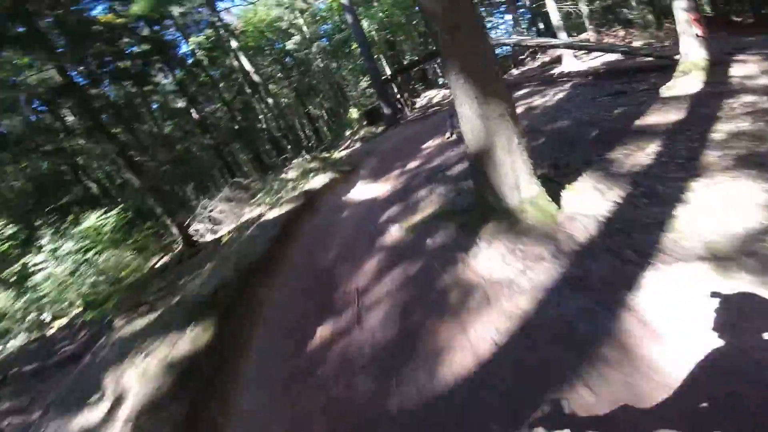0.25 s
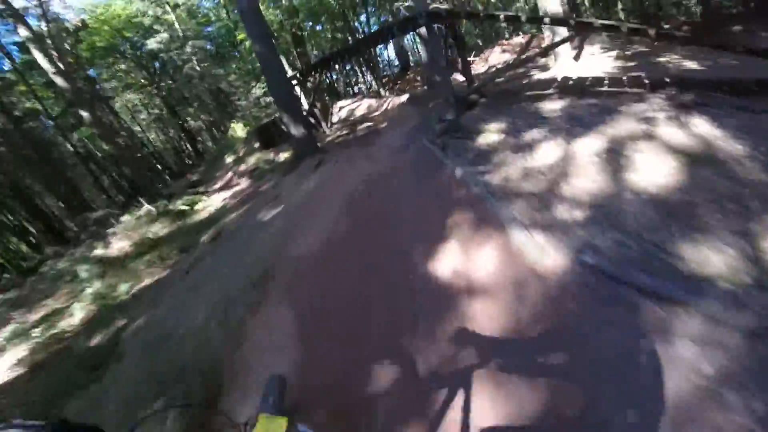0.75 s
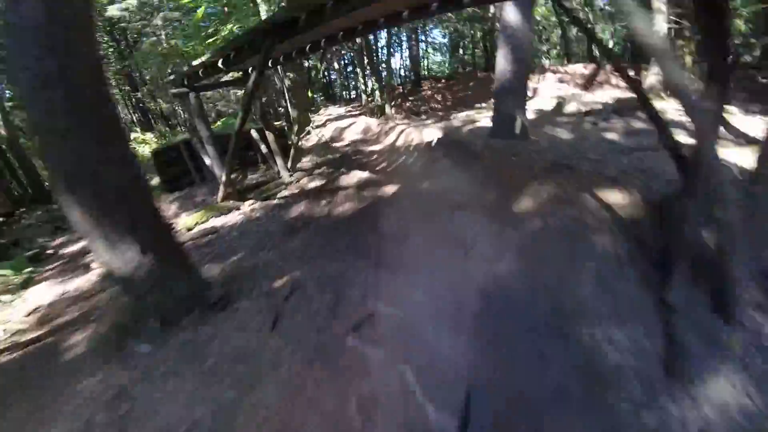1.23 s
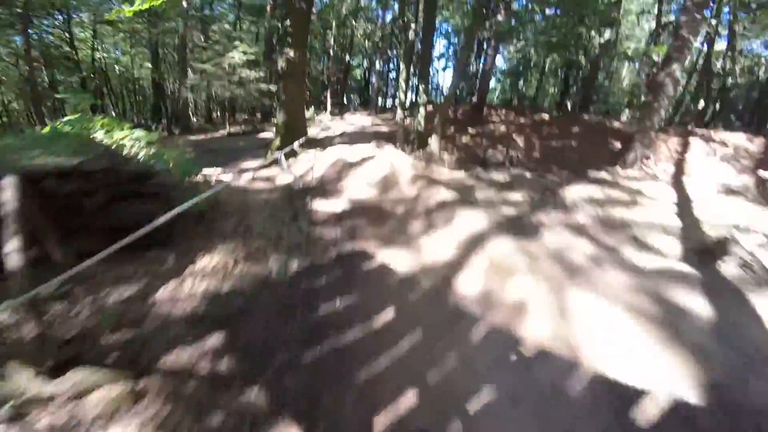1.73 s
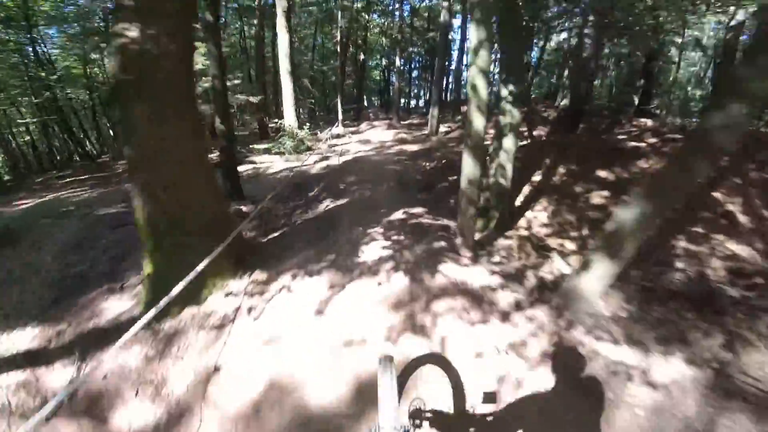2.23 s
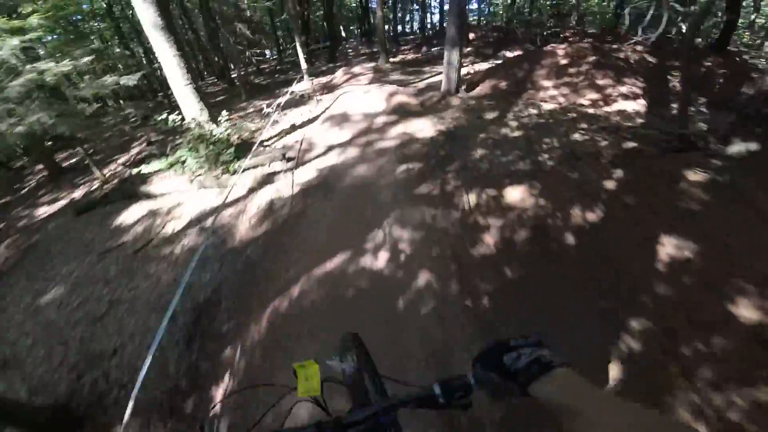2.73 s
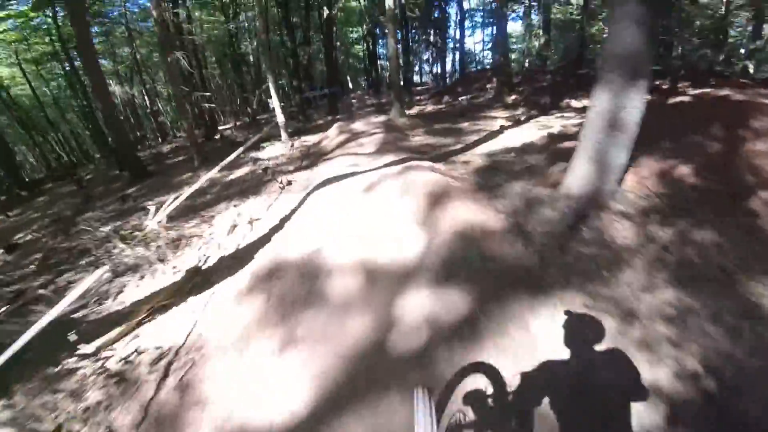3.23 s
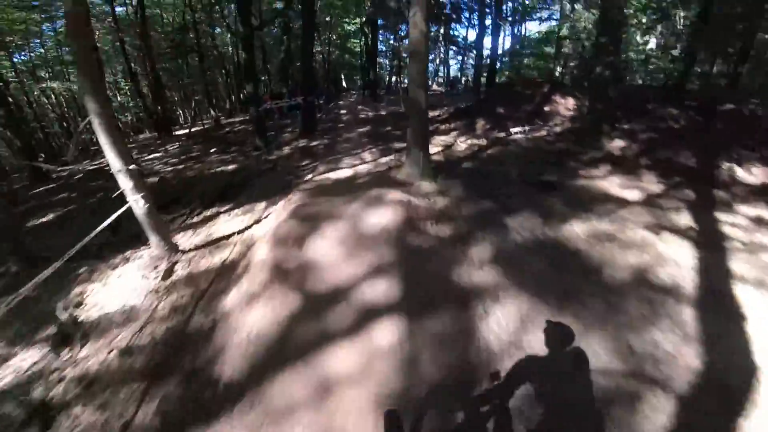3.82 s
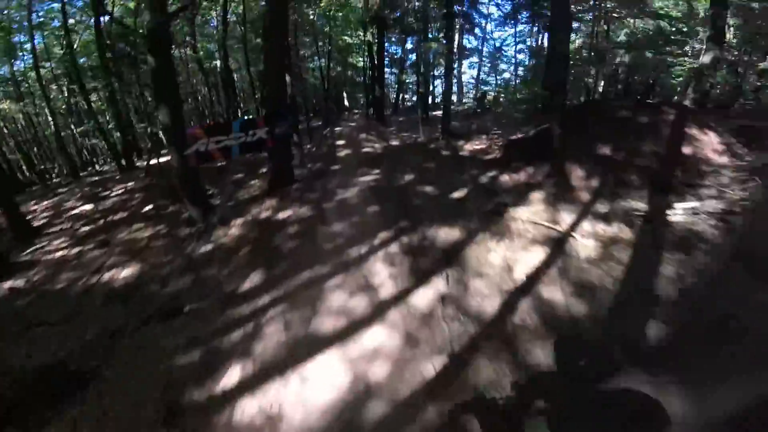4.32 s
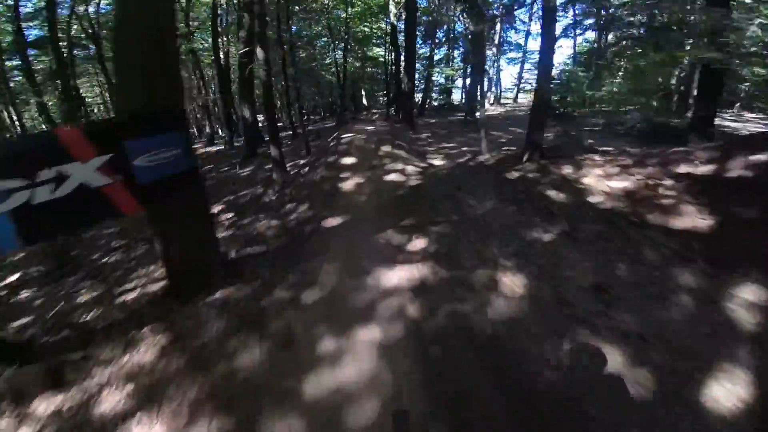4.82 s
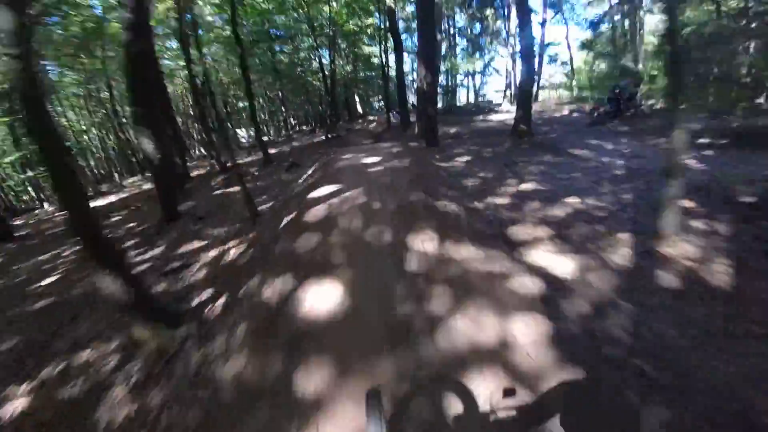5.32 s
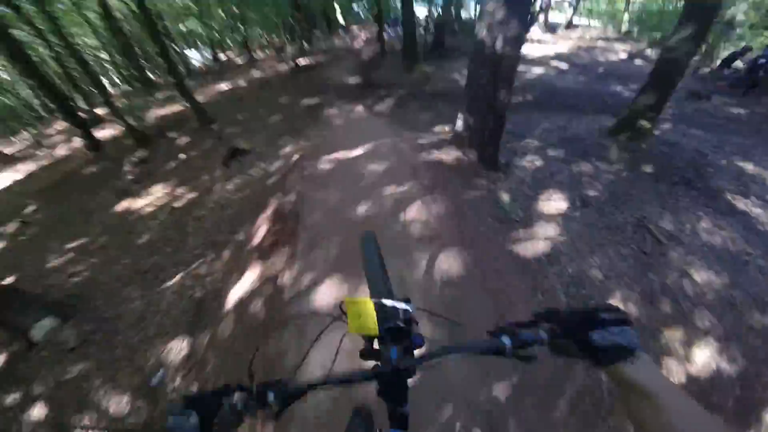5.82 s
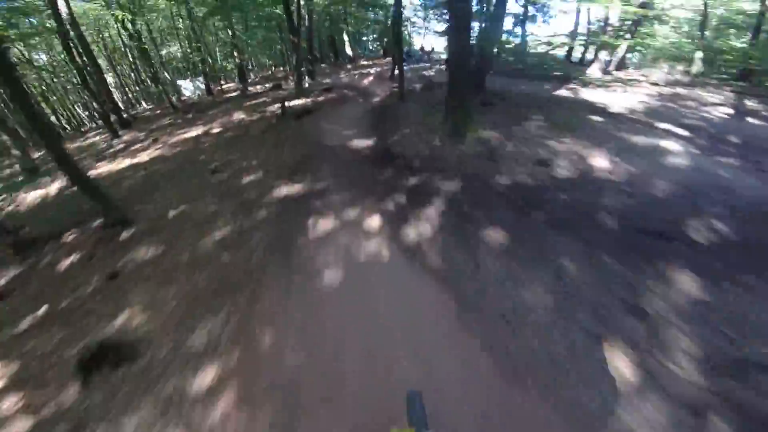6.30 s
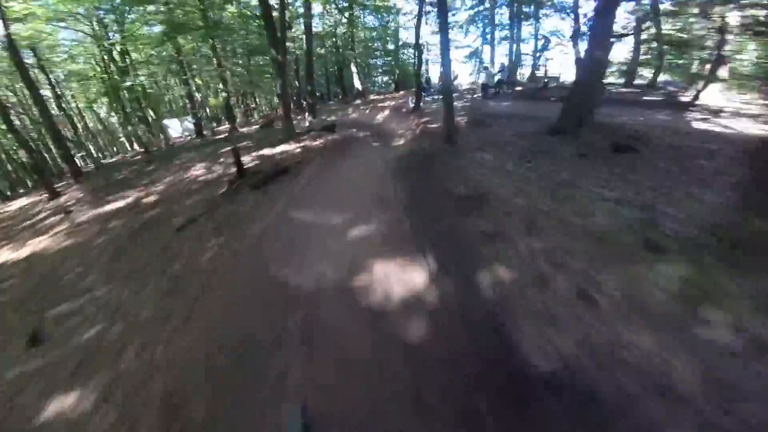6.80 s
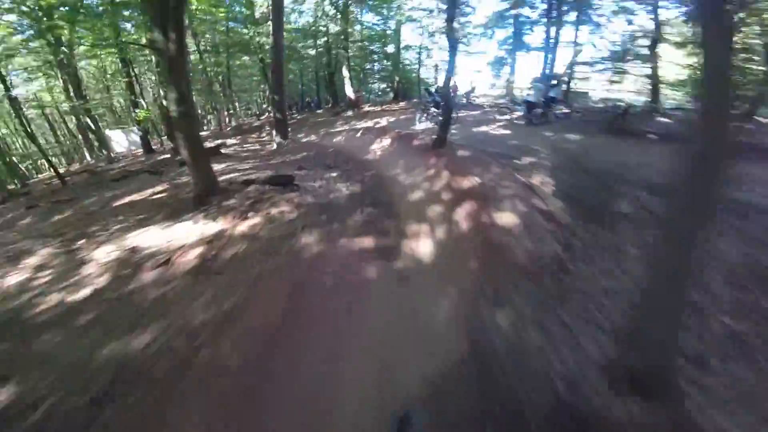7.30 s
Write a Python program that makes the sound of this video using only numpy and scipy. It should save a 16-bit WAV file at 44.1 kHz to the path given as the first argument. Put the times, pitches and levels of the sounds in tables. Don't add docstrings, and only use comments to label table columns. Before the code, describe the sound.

A mountain bike speeds down a dirt forest trail, heard from a helmet microphone close above the tyres. From 0 to 2.4 seconds knobbly tyres roar and crunch over roots with dull knocks, chain slaps and stone ticks, the sharpest clatter near 0.9, while low gusts shake and flutter over the microphone. At 2.5 the wheels lift, the roar fades and a faint freehub ratchet whirs; at 3.0 a hard landing brings a jolt and thump. The rolling is softer until a tiny hop at 3.8. From 4 to 5.7 the ground gets rougher, with hissing grit, hollow casing booms and a heavy compression around 5.6. Short jumps at 5.8 and 6.24 thin the tread, each ending in an abrupt return, with mount bumps near 6.35. Then the grainy roar builds again, with scattered ticks and windy buffeting until the end at about 7.5.

```python
import sys
import numpy as np
from scipy import signal
from scipy.fft import rfft, irfft, next_fast_len
from scipy.io import wavfile
from scipy.ndimage import uniform_filter1d, map_coordinates

SR = 44100
rng = np.random.default_rng(int(sys.argv[2]) if len(sys.argv) > 2 else 0)


def boost_factor(decibels):
    exponent = np.asarray(decibels, float) / 20
    return 10 ** exponent


def pcm_store(signal):
    levels = np.round(np.clip(np.atleast_2d(signal), -1, 1) * 32767)
    wavfile.write(sys.argv[1], SR, levels.astype(np.int16).T)


N = 332955
STEP_S = .002

# peak in [s], shake in [dB], flutter in
# [dB], half length in [s].
GUSTS = [(0.0, -15, -23, 0.055), (0.4, -27, -30, 0.43), (1.1, -28, -45, 0.068), (2.0, -30, -36, 0.16),
         (2.22, -31, -30, 0.07), (3.27, -27, -55, 0.039), (3.46, -33, -64, 0.048), (3.97, -22.5, -59, 0.11),
         (4.27, -25.5, -34.5, 0.23), (4.68, -21, -34.5, 0.082), (5.1, -23.5, -31.5, 0.22),
         (5.55, -20, -32.5, 0.15), (5.97, -39, -31, 0.068), (6.17, -36.5, -36, 0.16),
         (6.42, -23, -53, 0.15), (6.6, -32.5, -47, 0.18), (6.83, -22, -34, 0.12), (7.55, -20.5, -33, 0.056),
         (0.155, -27, -22.5, 0.029), (0.56, -27, -49, 0.033), (0.686, -24, -28, 0.022),
         (0.8, -14.5, -39, 0.027), (0.95, -25, -34, 0.072), (1.447, -21.5, -42, 0.032),
         (1.589, -15, -30, 0.068), (1.799, -21, -30.5, 0.12), (2.376, -22, -57, 0.1),
         (2.545, -25.5, -29, 0.074), (2.701, -20.5, -36, 0.019), (2.868, -34.5, -32, 0.11),
         (3.127, -21, -51, 0.054), (3.61, -21.5, -55, 0.019), (3.788, -24.5, -48, 0.045),
         (4.838, -26, -31.5, 0.03), (5.225, -26, -23, 0.085), (5.684, -18.5, -34, 0.024),
         (5.78, -25, -55, 0.1), (7.043, -25, -32, 0.094), (7.197, -22, -36, 0.032),
         (7.273, -36, -35.5, 0.15)]
LULL_SHAKE_DB, LULL_FLUTTER_DB = -34.5, -39.5
# frequency in [Hz], level in [dB per Hz].
SHAKE_COLOUR = [(4.7, -26), (8.0, 2.5), (32, 5.5), (75, -29.5), (98, -19), (160, -120)]
# frequency in [Hz], level in [dB per Hz].
FLUTTER_COLOUR = [(35, -15.5), (60, 5), (157, -6), (412, -35.5), (451, -64), (709, -40.5), (900, -42),
                  (1170, -101), (1980, -120)]
# frequency in [Hz], width in [Hz], level in [dB].
HELMET_AIR = [(267, 134, 0)]
HUM_UNDER_FLUTTER_DB, HUM_IDLE_DB = 19, -63.5
# time in [s], depth in [dB].
NODS = [
    (.162, -12),
    (.681, -10.5),
    (3.099, -8),
    (3.905, -16),
    (4.007, -11.5),
    (5.463, -12.5),
    (5.643, -11.5),
    (6.421, -11),
    (7.196, -10.5),
]
NOD_S = .011

# start in [s], peak in [dB], pitch in [Hz].
BLOWS = [(0.15, -23.5, 133), (0.5, -24.5, 125), (0.9, -22.5, 130), (2.5, -20.5, 140), (2.599, -20.5, 144.6),
         (2.893, -27, 130), (3.754, -24.5, 131), (4.373, -24.5, 140), (5.3, -25.5, 120),
         (5.683, -17.5, 118), (6.19, -29.5, 152), (0.927, -8.5, 46.6), (1.6, -24, 77.5), (1.613, -16, 64),
         (1.553, -19.5, 125), (0.4, -20.5, 141), (0.04, -24.5, 130), (4.27, -29, 160), (0.3, -29, 200),
         (1.38, -28, 132), (2.5, -26, 200), (2.849, -26, 70), (5.7, -24, 58)]
BLOW_CYCLES = 12.1
# time in [s], jump in [dB], direction (signed share), creep in [s], judder in [dB].
MOUNT_SLIPS = [
    (0.737, -25.5, -0.88, 0.011, -32),
    (3.041, -13, 0.88, 0.011, -30.5),
    (5.405, -22, 0.54, 0.0038, -54),
    (5.6009, -22.5, 0.8, 0.0072, -33.5),
    (6.337, -28, 1, 0.016, -50),
    (6.3692, -20, 0.81, 0.03, -54),
]

# take-off in [s], landing in [s], roll lost in [dB],
# ratchet gained in [dB].
FLIGHTS = [
    (2.49, 2.987, 4.5, 2.5),
    (3.836, 3.894, 5, 5),
    (5.78, 6.007, 8, 0),
    (6.237, 6.317, 4, 1),
]
LIFT_S, LAND_S = 0.076, .004
# time in [s], ratchet rate in [teeth per s].
RATCHET_RATE = [(0, 100), (1, 108), (2, 92), (2.8, 120), (3, 81), (3.8, 93), (4.45, 120), (5.1, 160),
                (5.9, 92), (6.2, 73), (6.9, 89), (7.55, 125)]
# frequency in [Hz], width in [Hz], level in [dB].
HUB_BANDS = [(2800, 450, 1), (5400, 600, -1), (6450, 200, 2), (9300, 500, -10), (10650, 250, -18),
             (12100, 500, -4), (13200, 450, 0)]
HUB_DB = -83.5
# middle in [s], loss in [dB], rise in [s], release in [s].
PAWL_RESTS = [
    (0.8, 9, 0.07, 0.33),
    (1.75, 3, .1, 0.28),
    (3.08, 21, 0.036, 0.42),
    (4.0, 4, .4, 0.75),
    (6.54, 9, 0.25, 0.46),
]

# time in [s], peak in [dB], pitch in [Hz], t60 in [s], ring over puff in [dB].
CHAIN_SLAPS = [(0.0487, -35.5, 6500, 0.055, 1), (0.2279, -43, 6480, 0.05, -6),
               (0.2468, -38.5, 6500, 0.058, -4), (0.275, -39, 6500, 0.046, 6),
               (0.3252, -38, 6310, 0.05, -4), (0.3726, -38, 6420, 0.05, -4),
               (0.4135, -32.5, 6410, 0.046, -3), (0.6903, -36, 6360, 0.05, -7),
               (0.8036, -36, 6480, 0.035, -10), (0.8295, -43, 6600, 0.05, -6),
               (0.8946, -22, 6700, 0.037, -8), (0.9154, -36, 6520, 0.066, -7), (0.9837, -44, 6970, 0.05, 2),
               (1.0116, -47, 6830, 0.05, -4), (1.4052, -40, 6470, 0.045, -6), (1.5145, -37, 6400, 0.046, 1),
               (1.6866, -43, 6340, 0.05, -6), (1.7549, -41, 6450, 0.058, -6), (2.029, -44, 6420, 0.05, 0),
               (2.39, -40, 6470, 0.05, -4), (2.8105, -42, 6470, 0.05, -6), (3.1258, -40.5, 6660, 0.081, 0),
               (3.3972, -49, 6110, 0.06, -6), (3.45, -45, 6130, 0.044, -9), (3.8044, -44, 6560, 0.046, -6),
               (4.0632, -40, 6410, 0.05, -3), (4.1849, -42, 6440, 0.05, -1), (4.226, -39, 6500, 0.056, -6),
               (4.3635, -31, 6500, 0.059, -11), (5.0459, -43, 6360, 0.05, 0), (5.424, -37, 6590, 0.084, -9),
               (5.5846, -35, 5830, 0.14, -11), (5.7608, -42, 6510, 0.05, -4), (5.7708, -35, 8300, 0.05, -8),
               (6.989, -43, 6420, 0.05, -6), (7.1824, -43.5, 6490, 0.075, -6)]
# time in [s], peak in [dB], pitch in [Hz], t60 in [s], ring over puff in [dB].
STONES = [(0.1356, -39, 5660, 0.065, -6), (0.63, -39, 5250, 0.055, -4), (1.055, -37.5, 5400, 0.055, -14),
          (1.5435, -31.5, 4890, 0.057, -6), (1.5998, -44, 3590, 0.055, -6), (1.6104, -40, 5280, 0.055, -6),
          (1.6447, -32, 5170, 0.055, -15), (2.354, -38, 5460, 0.055, -4), (2.431, -42, 4930, 0.055, -2),
          (2.4807, -39, 5010, 0.044, -6), (2.502, -37, 4970, 0.065, -6), (3.0842, -31.5, 5140, 0.048, -14),
          (3.667, -51, 3300, 0.055, 3), (3.7908, -43, 5180, 0.055, -6), (4.331, -46, 5140, 0.055, -4),
          (4.8965, -40, 5260, 0.072, -2), (5.0988, -40.5, 5040, 0.036, 5), (5.4031, -40, 5200, 0.047, -8),
          (5.5029, -39, 3550, 0.055, -11), (5.6935, -43, 5140, 0.055, 3), (5.7344, -31, 5070, 0.043, 2),
          (5.8343, -36, 5500, 0.046, -3), (6.2472, -39, 5170, 0.055, -11), (6.5395, -43, 5620, 0.074, -6),
          (6.8615, -36, 5170, 0.042, -16), (7.0085, -41, 4820, 0.055, -8), (7.4844, -42.5, 4830, 0.055, -6)]
# time in [s], peak in [dB], t60 in [s].
ROOTS = [(0.646, -26, 0.057), (0.692, -27.5, 0.045), (0.979, -38, 0.081), (1.025, -40, 0.3),
         (1.27, -39.5, 0.096), (1.314, -40, 0.099), (1.368, -30, 0.073), (1.399, -35, 0.074),
         (1.485, -32, 0.14), (2.3, -34, 0.09), (2.359, -35, 0.36), (2.536, -40, .055), (2.995, -39, 0.2),
         (3.077, -30, 0.05), (3.76, -43, 0.088), (3.942, -34.5, 0.055), (4.118, -37, 0.21),
         (5.532, -30, 0.13), (5.583, -36, 0.21), (6.319, -33.5, 0.082), (6.643, -38, 0.52),
         (7.537, -26, 0.048), (0.384, -34, .06), (0.449, -38, 0.05), (0.727, -24, 0.08), (0.897, -39, .1),
         (1.516, -31, .05), (1.566, -31, 0.097), (1.78, -36.5, 0.091), (1.945, -37.5, 0.1),
         (2.07, -34, .04), (2.238, -30, .06), (4.01, -32.5, 0.1), (4.051, -35, 0.088), (4.563, -44, .04),
         (4.73, -36, .05), (5.076, -41, 0.045), (5.314, -37, .06), (5.352, -31.5, 0.073), (5.755, -39, .08),
         (6.733, -32, .06), (6.861, -34, .05), (7.053, -39, .06), (7.093, -38, 0.067)]
ROOT_HZ, ROOT_RISE_S = 1310, 0.001274
# start in
# [s], peak in [dB], pitch in [Hz], t60 in [s].
BOOMS = [(0.578, -28.5, 527, 0.11), (0.649, -24.5, 625, 0.12), (0.733, -30, 633, 0.1),
         (1.391, -27, 284, 0.18), (1.842, -28, 570, 0.036), (2.181, -39, 436, 0.34),
         (2.314, -25, 489, 0.079), (2.419, -32.5, 465, 0.26), (2.519, -25, 315, 0.082),
         (2.568, -33, 282.6, 0.24), (3.759, -23.5, 276, 0.055), (3.761, -24, 610, 0.027),
         (5.766, -30, 507, 0.045), (4.699, -37, 376, 0.14), (6.969, -30, 620, .04),
         (4.361, -39, 1780, 0.045), (4.361, -40, 3310, .04), (7.105, -28, 260, 0.047),
         (5.218, -20.5, 238.5, 0.11), (5.498, -34.5, 460, 0.59), (6.191, -20.5, 240, 0.072),
         (2.545, -29.5, 420, 0.057), (2.6, -32, 367, 0.043), (2.89, -35.5, 386, 0.065),
         (5.131, -31, 265.6, 0.1), (5.271, -30, 302, .07), (5.701, -34, 330, 0.066),
         (1.77, -32.5, 291, 0.16)]
# middle in [s], rms level in [dB], pitch in [Hz], half length in [s].
SCUFFS = [(0.843, -46, 1500, 0.011), (1.651, -44, 1530, 0.016), (2.27, -39.5, 1300, 0.01),
          (2.391, -48.5, 1800, 0.028), (3.55, -48, 1300, 0.022), (3.365, -51.5, 1990, .015),
          (.651, -38, 1390, .014), (.732, -41, 2700, 0.0056), (2.31, -43, 1600, .014),
          (4.287, -53, 3200, .008), (4.15, -51.5, 2200, .025), (4.74, -46, 1900, .09),
          (4.832, -45.5, 1500, 0.014), (6.446, -52.5, 1960, 0.0088), (6.66, -48, 1790, 0.018),
          (6.791, -51.5, 1980, 0.027)]

# thickest spray in [s], hiss in [dB], rise in [s], release in [s].
LOOSE_PATCHES = [(0.0, -48, .1, 0.079), (0.36, -50.5, 0.35, 0.17), (0.7, -51, 0.2, 0.25),
                 (1.1, -63, 0.064, 0.19), (1.4, -50.5, 0.027, 0.043), (1.62, -46.5, 0.15, 0.1),
                 (2.2, -57, 0.11, 0.11), (2.37, -53, 0.095, .04), (2.46, -49.5, 0.058, 0.077),
                 (2.75, -59.5, 0.15, 0.43), (3.04, -52.5, 0.045, 0.075), (3.65, -67, 0.057, 0.12),
                 (4.05, -57, 0.084, 0.094), (4.33, -58, 0.26, 0.022), (4.76, -62, 0.2, 0.21),
                 (5.07, -55, 0.23, 0.12), (5.47, -54, 0.23, 0.12), (5.71, -52, 0.15, 0.042),
                 (5.82, -57.5, 0.067, 0.072), (6.15, -60, 0.16, 0.033), (6.3, -62, .06, 0.077),
                 (6.8, -60, 0.13, 0.5), (7.55, -58, 0.093, 0.12), (0.71, -45, .015, 0.016),
                 (0.79, -51, .02, .02), (1.425, -51, .02, .015), (1.56, -53, .012, 0.014),
                 (4.03, -52, .012, .015), (5.71, -48, .02, .015), (4.245, -47, 0.022, 0.035),
                 (5.8, -57, .01, .012), (2.46, -56, .03, .02)]
PACKED_DB = -61.5
# frequency in [Hz], level in [dB per Hz].
HOUSING_COLOUR = [(1300, -20.5), (2500, -9.5), (3700, -10), (4210, -11), (5190, -1.5), (6040, -9),
                  (6250, -9), (6440, -2), (6750, -4), (7290, -9.5), (9270, -14), (10300, -14), (13400, -51),
                  (22000, -120)]
# frequency in [Hz], width in [Hz], level in [dB].
SHELL_MODES = [(5450, 170, -6.5), (6440, 160, -4.5)]
SHELL_DB = -11
# full load in [s], roar in [dB], rise in [s], release in [s].
ROLLERS = [(0.03, -46, .1, 0.15), (0.27, -47.5, 0.047, 0.15), (0.4, -46.5, 0.04, 0.23),
           (0.64, -45, 0.21, 0.15), (0.91, -49, 0.057, 0.064), (1.39, -51, 0.046, 0.089),
           (1.6, -46.5, 0.093, 0.17), (1.82, -51, 0.15, 0.023), (2.1, -51, 0.29, 0.11),
           (2.3, -47.5, 0.18, 0.16), (2.45, -52, 0.23, 0.016), (3.15, -56, 0.057, 0.35),
           (3.44, -53, 0.29, 0.34), (4.14, -47, 0.15, 0.11), (4.82, -44.5, 0.28, 0.19),
           (5.02, -52, 0.16, 0.21), (5.3, -50.5, 0.24, 0.26), (5.53, -43, 0.27, 0.15),
           (5.78, -60, 0.033, 0.07), (6.04, -57, 0.023, .1), (6.66, -50, 0.15, 0.11),
           (6.79, -48, 0.079, 0.2), (7.15, -48, 0.21, 0.14), (7.55, -53, 0.28, .1), (2.9, -60, 0.059, .08),
           (6.34, -52, .01, 0.034), (6.66, -54, .02, 0.027), (7.12, -48, .03, 0.026)]
ROLLING_DB = -56
# frequency in [Hz], level in [dB per Hz].
TREAD_COLOUR = [(300, -5.5), (500, -1), (620, -1), (720, -5), (850, -1.5), (1300, -5.5), (1800, -8.5),
                (2300, -13.5), (2800, -21.5), (3500, -22), (4200, -33), (5500, -56), (9000, -120)]
# frequency in [Hz], width in [Hz], level in [dB].
CASING_MODES = [(280, 65, 1), (460, 90, -4), (607, 16, -4.5)]
DRONE_OVER_LOAD_DB = 1
# frequency in [Hz], width in [Hz], level in [dB].
CRUNCH_MODES = [(1946, 1030, 0)]
CRUNCH_DB, CRUNCH_GROWS, FULL_LOAD_DB = -11, 1.56, -44

PREAMP_DB, PREAMP_HZ = -84, 10200
STARVED_HZ, HOLE_SHARE, EDGE_JITTER_HZ = 9400, .42, 250
# time in [s], frequency in [Hz].
TREBLE_EDGE = [(0, 13500), (.9, 14000), (1.3, 13600), (1.5, 12700), (2.05, 13500), (3.03, 13600),
               (3.07, 11200), (3.3, 13200), (3.8, 13000), (4, 13900), (5.3, 13400), (6.36, 14200),
               (6.42, 12600), (6.7, 13700), (7.55, 13800)]
# start in [s], end in [s].
BUSY = [
    (.83, 1.08),
    (3.23, 3.39),
]


def unit(x):
    return x / np.sqrt(np.mean(x ** 2) + 1e-20)


def curves(rows):
    s, *cols = np.transpose(rows)
    return [np.interp(np.arange(N) / SR, s, c) for c in cols]


def wobble(rate):
    knots = rng.standard_normal(int(N * rate / SR) + 4)
    return map_coordinates(knots, [np.arange(N) * rate / SR])


def filtered(x, response):
    m = next_fast_len(N + SR // 2)
    return irfft(rfft(x, m) * response(np.fft.rfftfreq(m, 1 / SR)), m)[:N]


def colour(points):
    f, db = np.transpose(points)
    return lambda hz: boost_factor(np.interp(np.log(hz + 1), np.log(f + 1), db))


def resonant(modes):
    def response(f):
        return sum((-1) ** k * boost_factor(db) * 1j * f * w / (c * c - f * f + 1j * f * w)
                   for k, (c, w, db) in enumerate(modes))
    return response


def dulled(x, hz, order):
    return filtered(x, lambda f: 1 / (1 + (f / hz) ** order))


def grainy(spiky_db, rate):
    return rng.standard_normal(N) * boost_factor(spiky_db * wobble(rate))


def evened(x, seconds, share):
    size = int(seconds * SR)
    slow = uniform_filter1d(uniform_filter1d(unit(x) ** 2, size=size), size=size)
    return unit(x / (np.abs(slow) + 0.12) ** (share / 2))


def hump(s, rise, release):
    t = np.arange(0, N / SR + STEP_S, STEP_S) - s
    return np.exp(-(t / np.where(t < 0, rise, release)) ** 2)


def fine(coarse):
    return np.interp(np.arange(N) / SR, np.arange(len(coarse)) * STEP_S, coarse)


def swells(rows, rest_db):
    power = sum((boost_factor(db) * hump(s, rise, release)) ** 2 for s, db, rise, release in rows)
    return np.sqrt(boost_factor(rest_db) ** 2 + fine(power))


def airborne():
    t = np.arange(N) / SR
    return sum(np.outer(db, np.tanh((t - up) / LIFT_S) - np.tanh((t - down) / LAND_S)) / 2
               for up, down, *db in FLIGHTS)


def bursts(events, gain_db, width):
    puff, ring, t = np.zeros(N + SR), np.zeros(N + SR), np.arange(SR // 8) / SR
    for s, db, hz, t60, ring_db, rise in events:
        shape = boost_factor(db + gain_db - 60 * t / t60) * (1 - np.exp(-t / rise))
        noise = rng.standard_normal(len(t))
        b, a = signal.iirpeak(hz, 1 / width, SR)
        at = round((s - rise) * SR)
        puff[at:at + len(t)] += shape * noise
        ring[at:at + len(t)] += boost_factor(ring_db) * shape * unit(signal.lfilter(b, a, noise))
    return puff[:N], ring[:N]


def gusts():
    rows = GUSTS
    shaking = swells([(s, db, half, half) for s, db, _, half in rows], LULL_SHAKE_DB)
    fluttering = swells([(s, db, half, half) for s, _, db, half in rows], LULL_FLUTTER_DB)
    return shaking, fluttering


def wind(shaking, fluttering):
    shake = filtered(rng.standard_normal(N), colour(SHAKE_COLOUR))
    shake = evened(shake, seconds=0.034, share=1.0)
    flutter = filtered(grainy(spiky_db=1.5, rate=110), colour(FLUTTER_COLOUR))
    flutter = evened(flutter, seconds=0.048, share=0.21)
    return boost_factor(0.8) * shaking * shake + boost_factor(-1.8) * fluttering * flutter


def hum(fluttering):
    air = filtered(grainy(spiky_db=2.5, rate=32), resonant(HELMET_AIR))
    air = dulled(air, 700, 4)
    level = np.hypot(boost_factor(-HUM_UNDER_FLUTTER_DB) * fluttering, boost_factor(HUM_IDLE_DB))
    return level * evened(air, seconds=0.076, share=0.71)


def nods():
    out, u = np.zeros(N + SR), np.arange(-SR // 20, SR // 20) / SR / NOD_S
    for s, db in NODS:
        at = round(s * SR) - SR // 20
        out[at:at + len(u)] -= boost_factor(db) * (1 - u * u) * np.exp(-u * u / 2)
    return out[:N]


def helmet_blows():
    out, t = np.zeros(N + SR), np.arange(SR // 6) / SR
    for s, db, hz in BLOWS:
        at = round(s * SR)
        decay = boost_factor(db + 1.0 - 60 * t * hz / BLOW_CYCLES)
        out[at:at + len(t)] -= decay * np.sin(2 * np.pi * hz * t) * (1 - np.exp(-t / 0.001))
    return filtered(out[:N], lambda f: 1 / (1 + 1j * f / 9000))


def mount_slips():
    out, judder, t = np.zeros(N + SR), np.zeros(N), np.arange(SR // 6) / SR
    for s, db, way, creep, judder_db in MOUNT_SLIPS:
        at = round(s * SR)
        out[at - len(t):at] -= way * boost_factor(db) * np.exp(-t / 0.011)[::-1]
        out[at:at + len(t)] += way * boost_factor(db) * 0.37 * np.exp(-t / 0.0013)
        scrape = rng.standard_normal(len(t)) * (t < creep)
        judder[at - len(t):at] += boost_factor(judder_db) * scrape[::-1]
    jumps = filtered(out[:N], lambda f: 1 / (1 + 1j * f / 9000))
    return jumps + filtered(judder, resonant([(1090, 250, 10.0), (2600, 590, 3.6)]))


def freehub():
    rate, = curves(RATCHET_RATE)
    rest_db = fine(sum(db * hump(s, *ramps) for s, db, *ramps in PAWL_RESTS))
    level_db = HUB_DB + airborne()[1] - rest_db
    tooth = np.cumsum(rate * (1 + 0.034 * wobble(25))) / SR % 1
    clicks = rng.standard_normal(N) * (boost_factor(-20 * tooth) + 0.36) * boost_factor(1.4 * wobble(90))

    def bands(f):
        peaks = sum(boost_factor(db) / (1 + ((f - hz) / width) ** 2 * 2) for hz, width, db in HUB_BANDS)
        return .07 * (f > 2000) + peaks
    return boost_factor(level_db + 24.5) * unit(filtered(clicks, bands))


def frame_hits():
    hits = [(*hit, .0005) for hit in CHAIN_SLAPS + STONES]
    puff, ring = bursts(hits, gain_db=-8.5, width=0.022)
    return boost_factor(12.0) * filtered(puff, colour(HOUSING_COLOUR)) + ring


def root_knocks():
    hits = [(s, db, ROOT_HZ, t60, -6, ROOT_RISE_S) for s, db, t60 in ROOTS]
    puff, ring = bursts(hits, gain_db=-7.5, width=0.89)
    return boost_factor(11.0) * filtered(puff, colour(TREAD_COLOUR)) + dulled(ring, 3200, 6)


def booms():
    out, t = np.zeros(N + SR), np.arange(SR // 4) / SR
    for s, db, hz, t60 in BOOMS:
        at = round(s * SR)
        decay = boost_factor(db - 3.0 - 60 * t / t60)
        out[at:at + len(t)] += decay * np.sin(2 * np.pi * hz * t) * (1 - np.exp(-t / 0.0041))
    return out[:N]


def scuffs():
    out, t = np.zeros(N + SR), np.arange(-SR // 5, SR // 5) / SR
    for s, db, hz, half in SCUFFS:
        b, a = signal.iirpeak(hz, 1.4, SR)
        clumps = boost_factor(2.2 * np.repeat(rng.standard_normal(len(t)), 100)[:len(t)])
        soil = clumps * rng.standard_normal(len(t))
        swell = np.exp(-(t / half) ** 2)
        rasp = swell * signal.lfilter(b, a, signal.lfilter(b, a, soil))
        at = round(s * SR) - SR // 5
        out[at:at + len(t)] += boost_factor(db) * np.linalg.norm(swell) / np.linalg.norm(rasp) * rasp
    return dulled(out[:N], 3300, 6)


def flying_grit(bumps):
    spray = swells(LOOSE_PATCHES, PACKED_DB)
    grit = filtered(grainy(spiky_db=2.5, rate=330), colour(HOUSING_COLOUR))
    grit = evened(grit, seconds=0.054, share=0.36)
    shell = filtered(grainy(spiky_db=5.5, rate=180), resonant(SHELL_MODES))
    grit = grit + boost_factor(SHELL_DB) * unit(filtered(shell, resonant(SHELL_MODES)))
    fizz = filtered(grit, lambda f: 1 / (1 + (7300 / (f + 1)) ** 12))
    dust_gain = boost_factor(1.6 * wobble(16) - 1.2) * (spray / boost_factor(-57.5)) ** -.35
    grit = grit + (dust_gain - 1) * fizz
    return spray * boost_factor(0.89 * bumps + 1.43 * wobble(30) - 1.0) * grit


def casing_drone(load, lost_db):
    drone = 0
    for mode in CASING_MODES:
        drone = drone + boost_factor(1.7 * wobble(9)) * filtered(grainy(spiky_db=2.0, rate=43), resonant([mode]))
    drone = dulled(unit(drone), 900, 4)
    return boost_factor(DRONE_OVER_LOAD_DB - 0.5 * lost_db) * load * evened(drone, seconds=0.24, share=0.42)


def tread_roar(load, bumps):
    roar = filtered(grainy(spiky_db=2.1, rate=150), colour(TREAD_COLOUR))
    roar = evened(roar, seconds=.04, share=.75)
    crunch = filtered(grainy(spiky_db=6.5, rate=90), resonant(CRUNCH_MODES))
    crunch = evened(filtered(crunch, resonant(CRUNCH_MODES)), seconds=.012, share=0.47)
    crunch_gain = boost_factor(CRUNCH_DB) * (load / boost_factor(FULL_LOAD_DB)) ** (CRUNCH_GROWS - 1)
    return load * boost_factor(0.45 * bumps + 0.7) * (roar + crunch_gain * crunch)


def tyres():
    lost_db = airborne()[0]
    load = swells(ROLLERS, ROLLING_DB - lost_db)
    bumps = wobble(22)
    return tread_roar(load, bumps) + casing_drone(load, lost_db) + flying_grit(bumps)


def scene():
    shaking, fluttering = gusts()
    air = wind(shaking, fluttering) + hum(fluttering)
    head = nods() + helmet_blows() + mount_slips()
    bike = freehub() + frame_hits() + root_knocks() + booms() + scuffs() + tyres()
    return (air + head + bike)[None]


def starved(x):
    hz, t, z = signal.stft(x, SR, nperseg=2048, noverlap=1536, boundary="even")
    field = uniform_filter1d(rng.standard_normal(z.shape), size=6, axis=1)
    field = uniform_filter1d(field, size=7, axis=2)
    holes = (field < np.quantile(field, HOLE_SHARE)) & (hz > STARVED_HZ)[:, None]
    jitter = np.repeat(rng.standard_normal(len(t)), 4)[:len(t)]
    edge = np.interp(t, *np.transpose(TREBLE_EDGE)) + EDGE_JITTER_HZ * jitter
    kept = ~(holes | (hz[:, None] > edge))
    return signal.istft(z * kept, SR, nperseg=2048, noverlap=1536)[1][:, :N]


def sputtered(x):
    hz, t, z = signal.stft(x, SR, nperseg=512, boundary="even")
    field = uniform_filter1d(rng.standard_normal(z.shape), size=8, axis=1)
    busy = sum((t > a) & (t < b) for a, b in BUSY) > 0
    lost = (unit(field) < (hz[:, None] - 11000) / 2500) & (hz > 8000)[:, None] & busy
    return signal.istft(z * ~lost, SR, nperseg=512)[1][:, :N]


def low_pass(x):
    return signal.sosfilt(signal.butter(12, 14200, fs=SR, output="sos"), x)


def record(dry):
    b, a = signal.butter(5, 9800, fs=SR)
    settled = signal.lfilter_zi(b, a) * dry[:, :1]
    heard = signal.lfilter(b, a, dry, zi=settled)[0]
    hiss = filtered(rng.standard_normal(N), lambda f: (f > PREAMP_HZ) * (f < 14200))
    heard = heard + boost_factor(PREAMP_DB) * unit(hiss)
    heard = sputtered(starved(heard))
    return low_pass(heard)


dry = scene()
out = record(dry)
pcm_store(out)
```